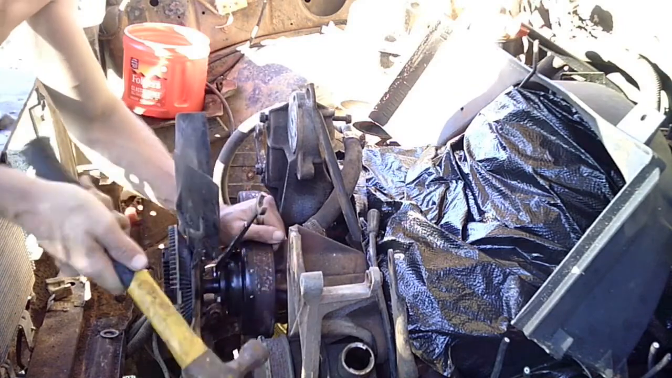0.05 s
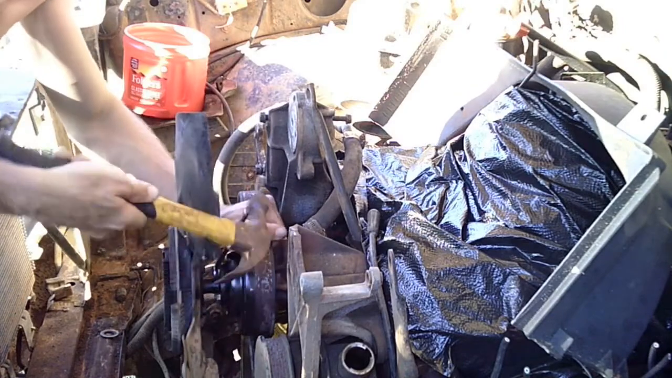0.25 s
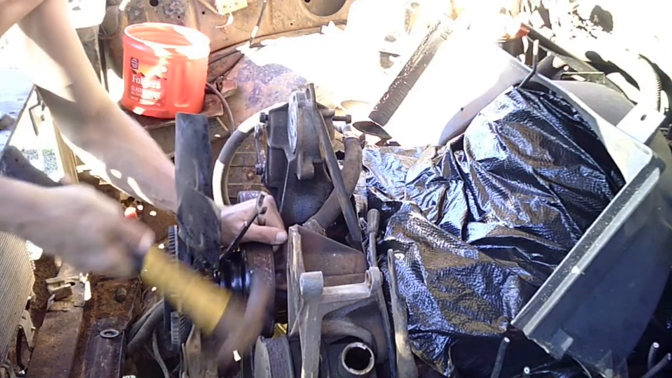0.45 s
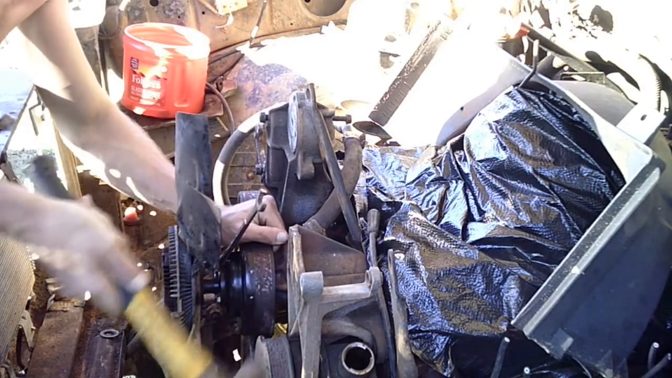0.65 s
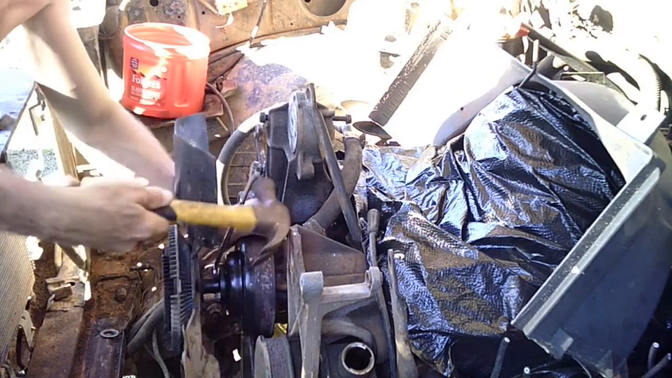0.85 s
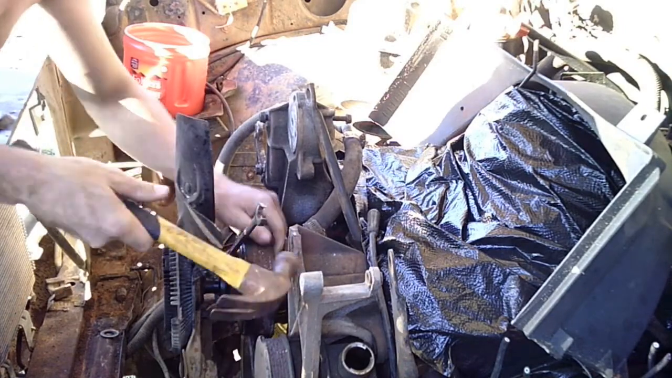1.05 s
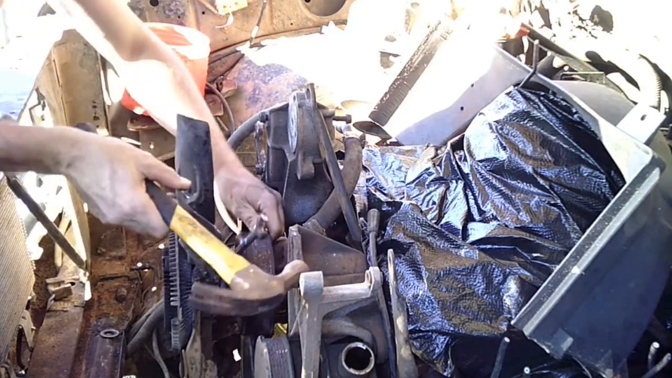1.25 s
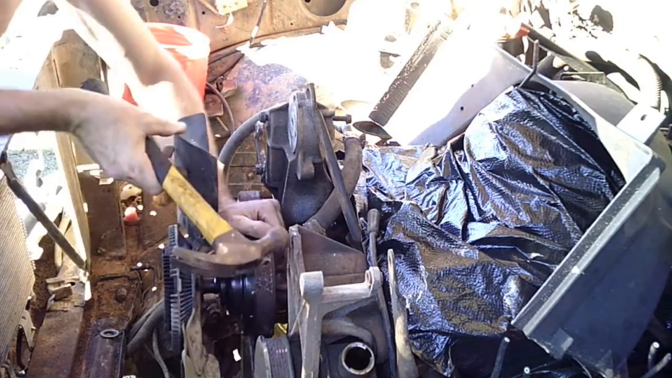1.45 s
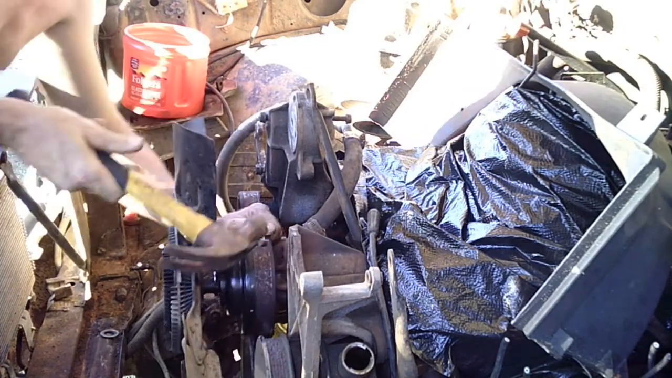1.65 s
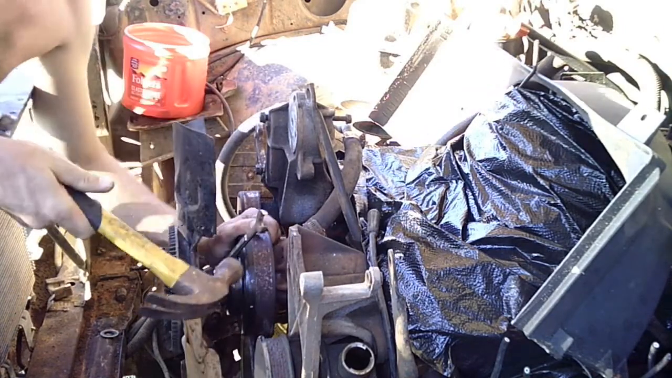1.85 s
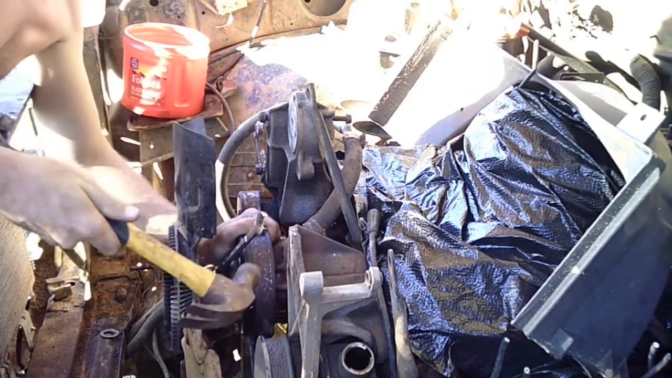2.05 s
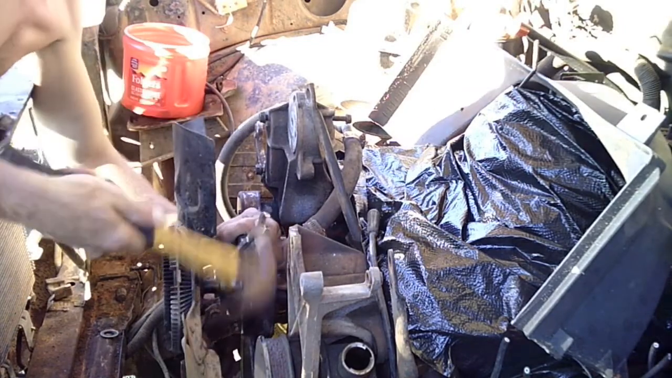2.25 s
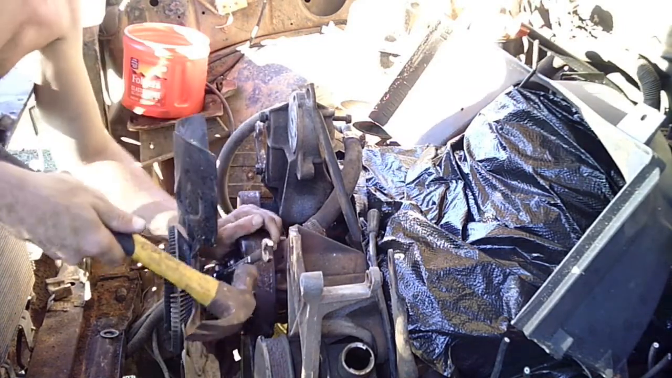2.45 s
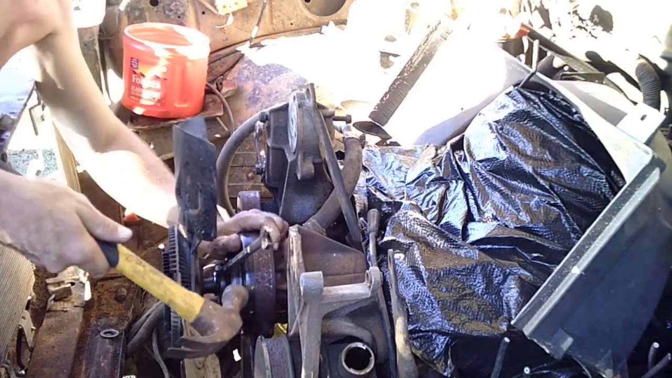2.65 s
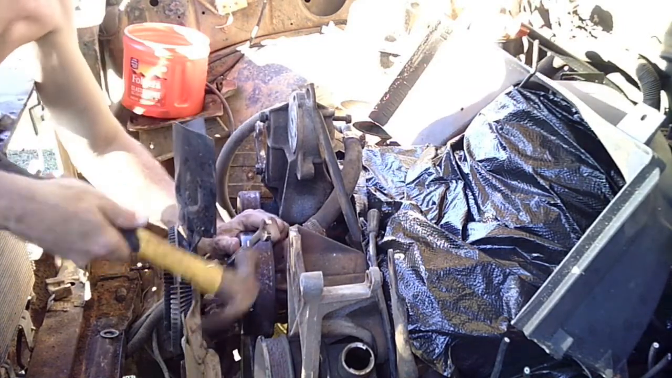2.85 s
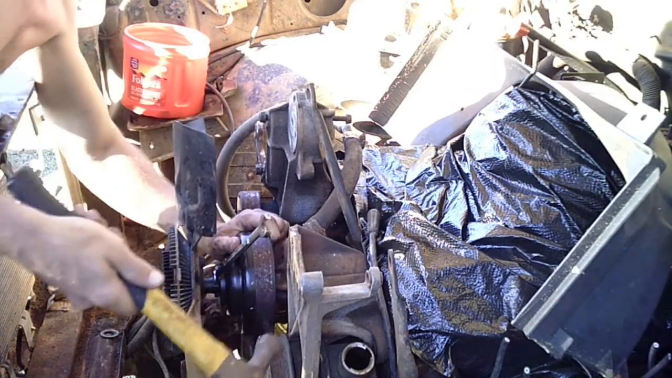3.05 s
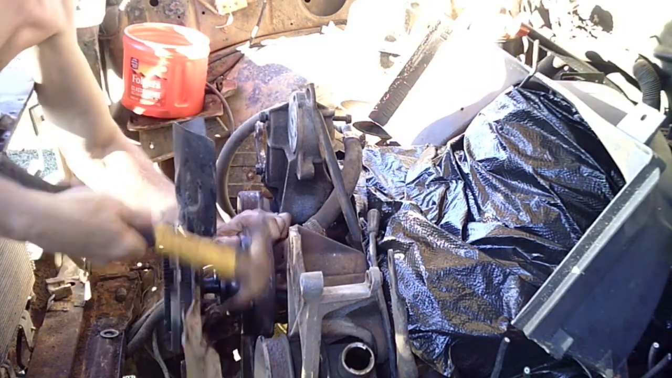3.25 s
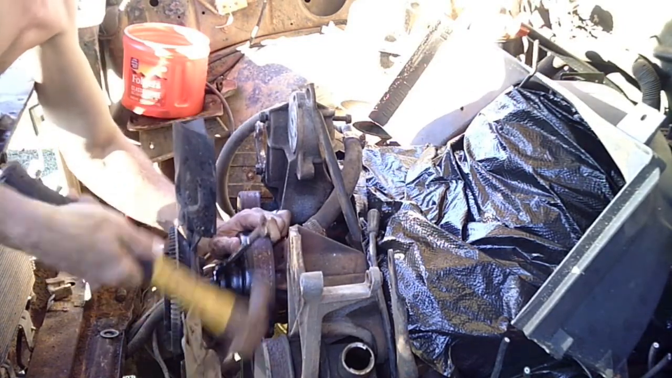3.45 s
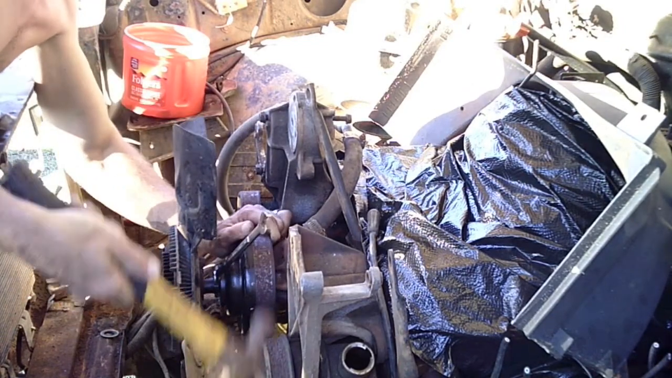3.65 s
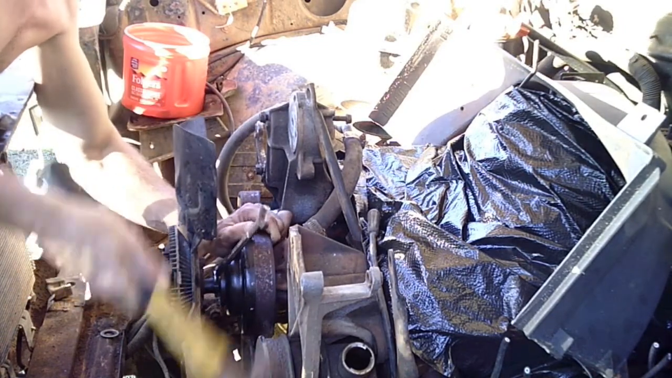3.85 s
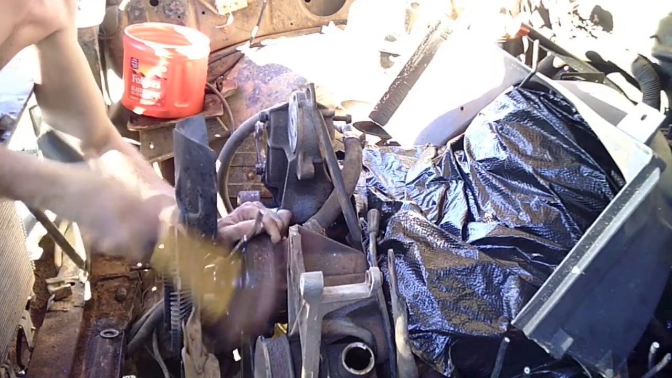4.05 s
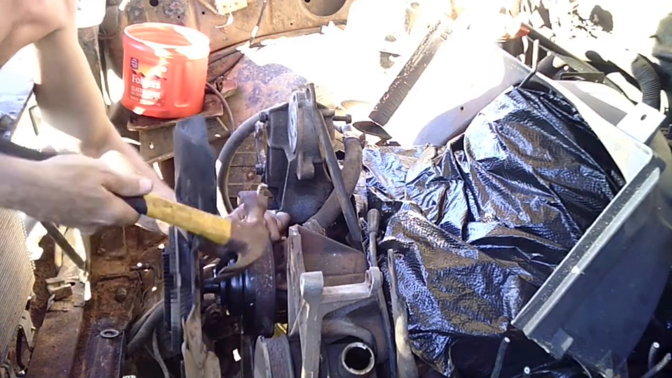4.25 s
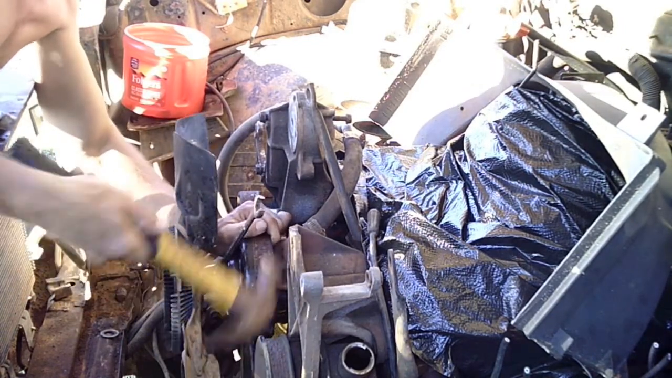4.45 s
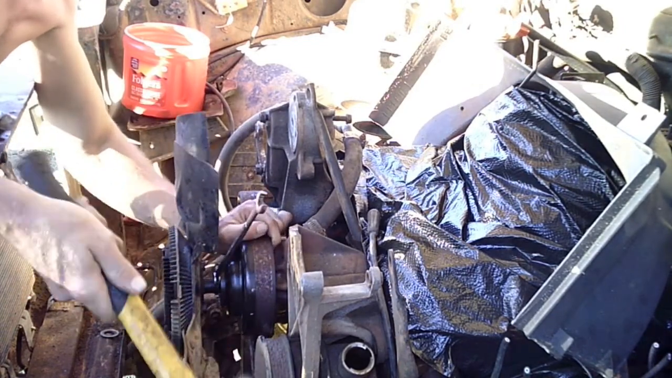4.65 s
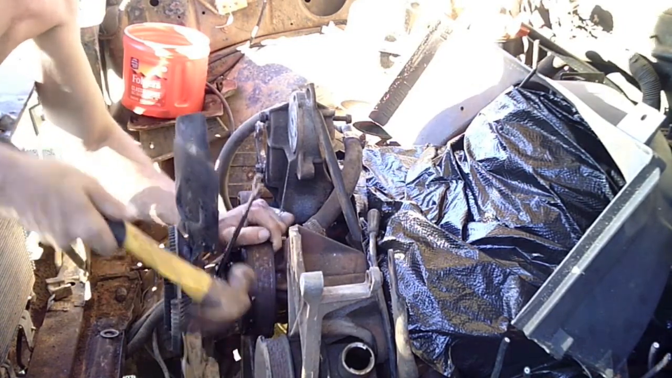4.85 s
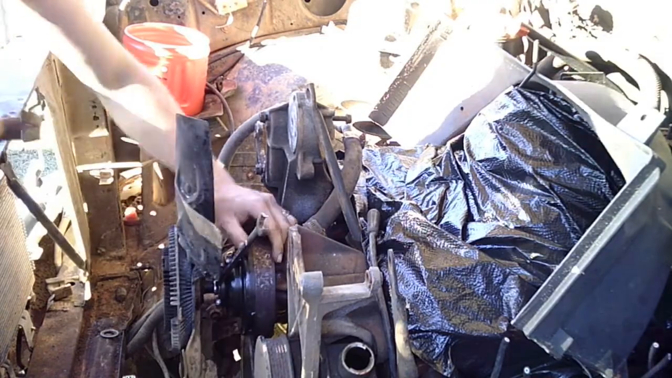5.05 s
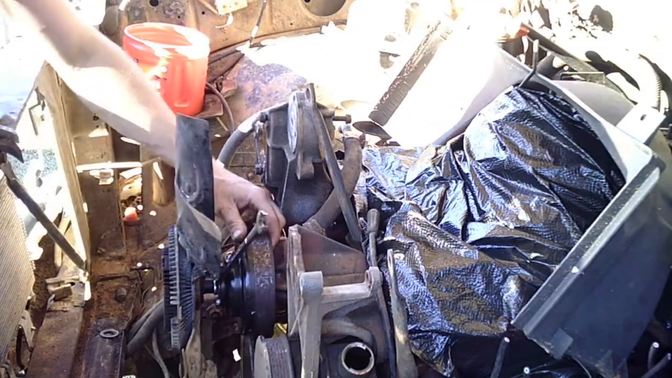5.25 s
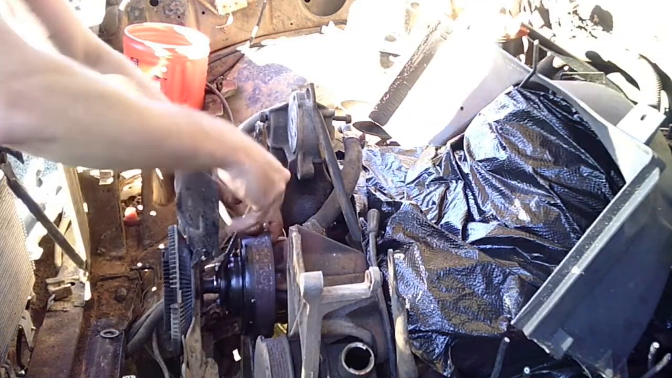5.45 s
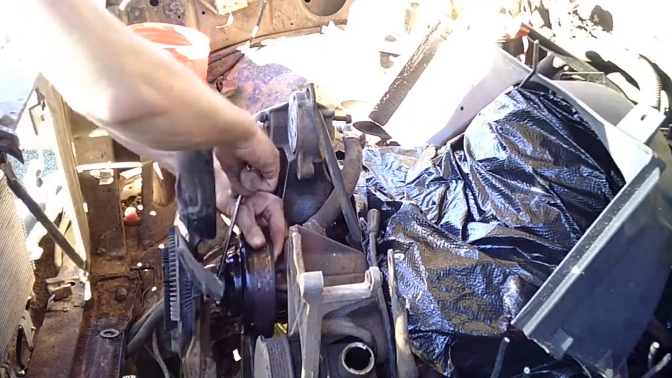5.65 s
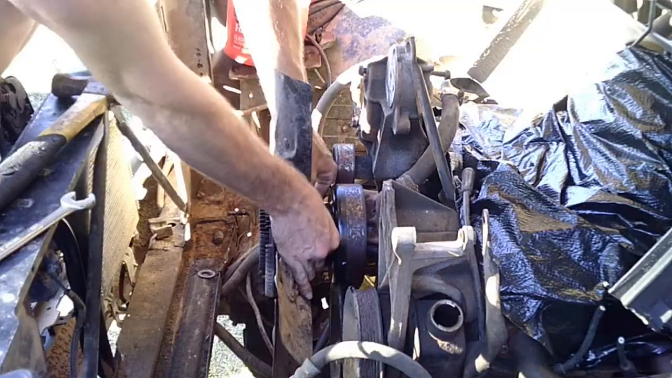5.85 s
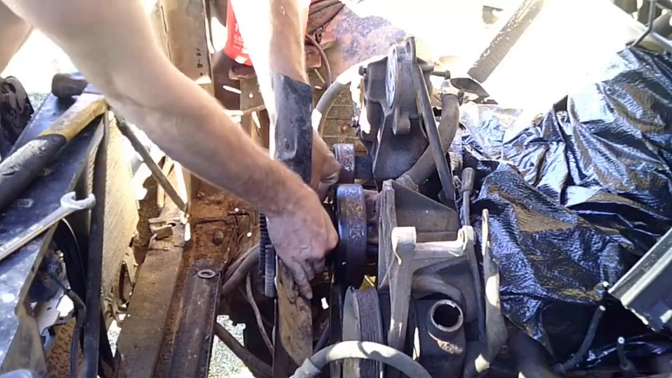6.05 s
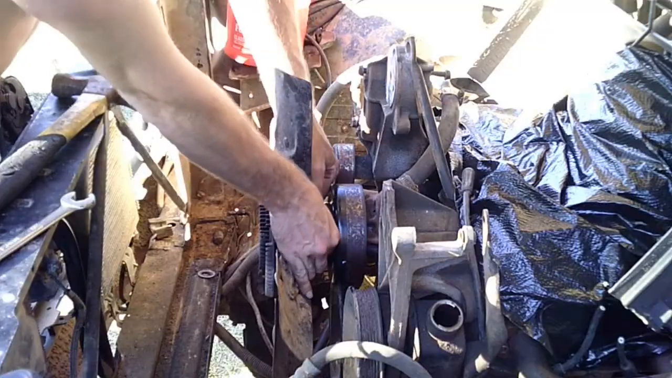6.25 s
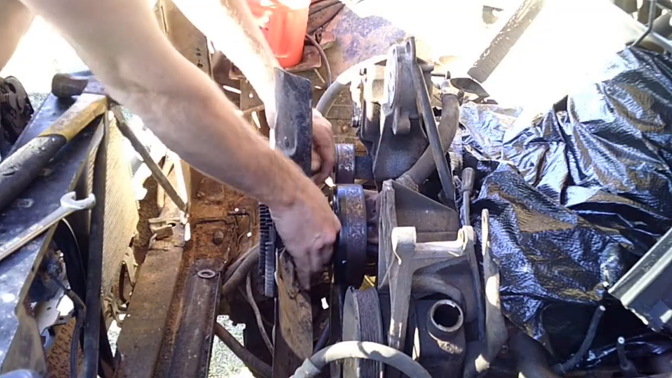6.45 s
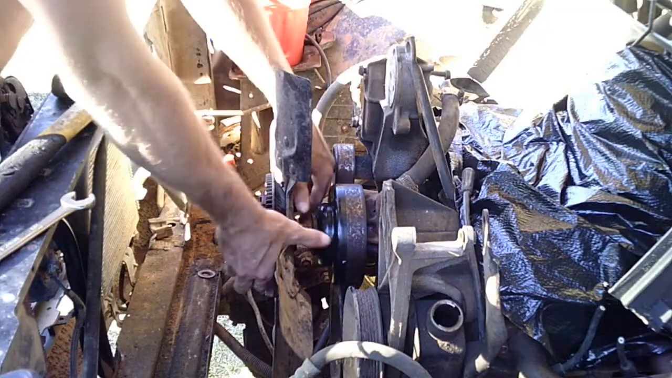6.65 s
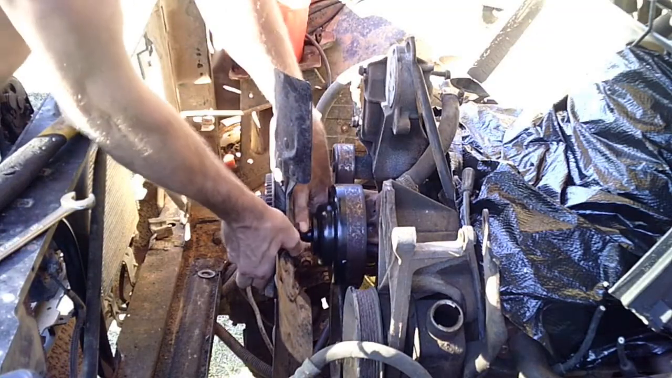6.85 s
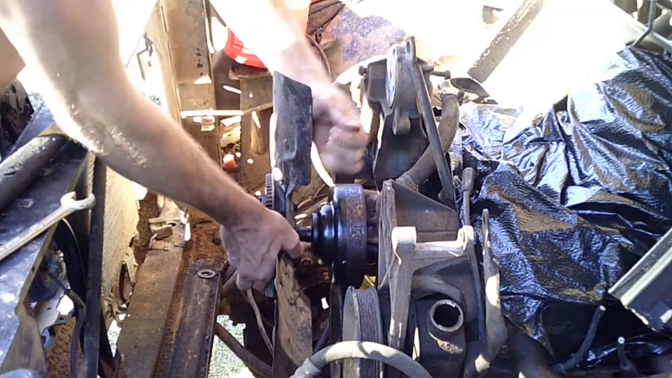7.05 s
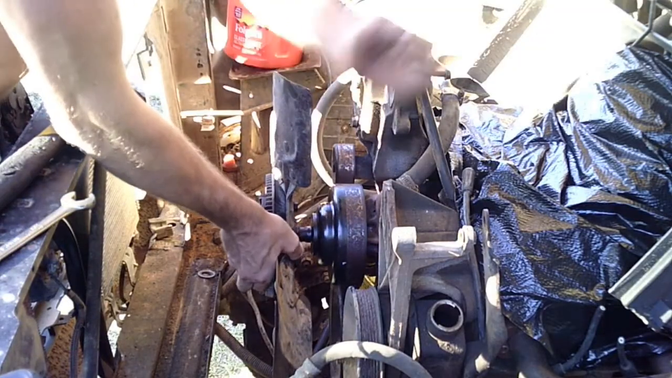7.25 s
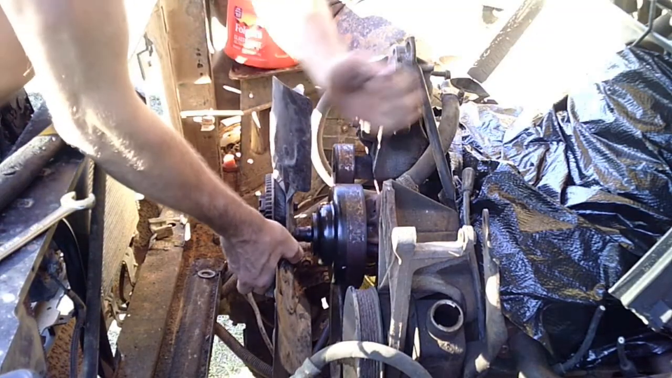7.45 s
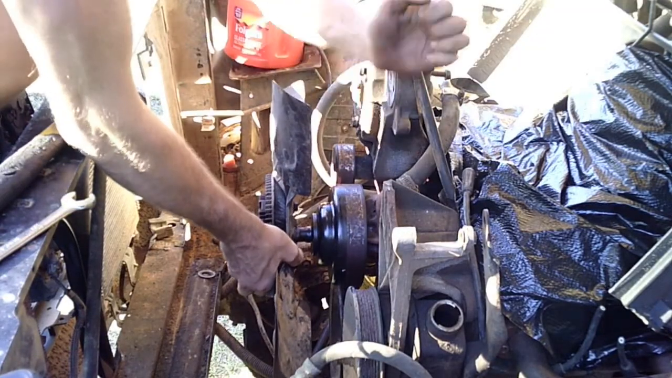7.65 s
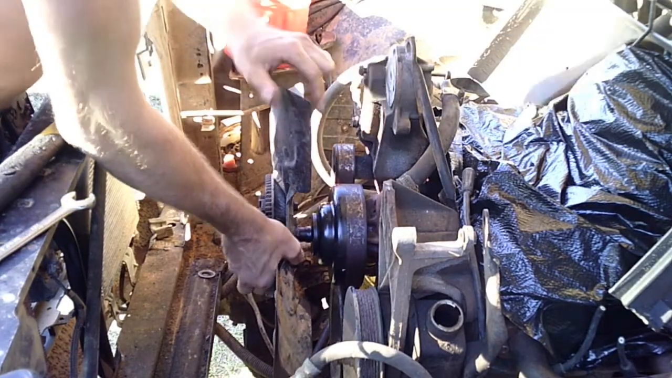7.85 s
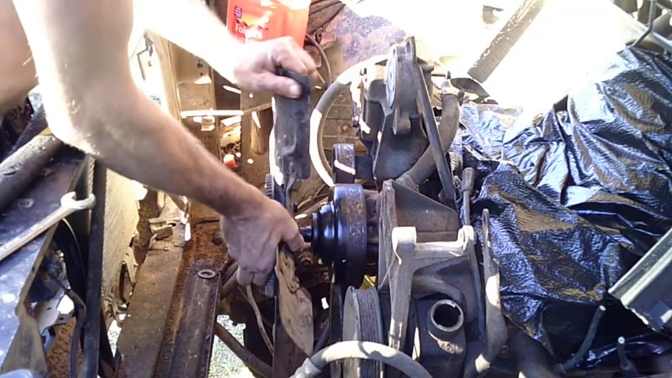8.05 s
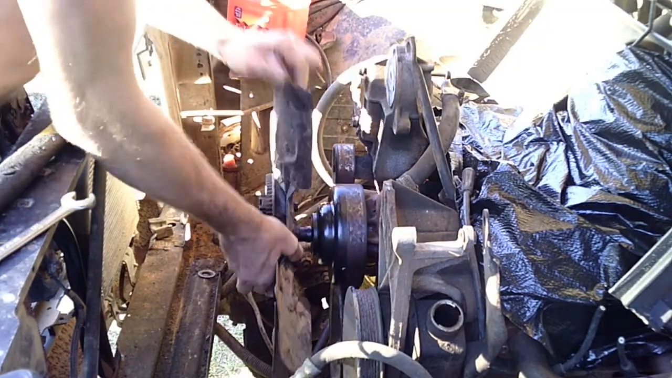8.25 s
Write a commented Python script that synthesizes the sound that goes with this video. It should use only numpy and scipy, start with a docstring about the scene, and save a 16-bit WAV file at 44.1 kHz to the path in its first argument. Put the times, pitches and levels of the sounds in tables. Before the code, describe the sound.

Light taps and hard hammer blows clank on steel outdoors, followed by a knock and soft clinks of handled metal parts.

```python
"""Hammering a wrench on a steel hub

Outdoors, a hammer strikes a wrench seated on a bolt of a machine hub, in light taps and hard blows.
Each impact is a short, harsh noise burst that holds, then cuts off; wrench, hammer head, hub, pipe and
collar ring on in damped modes. Parts are put down and handled. Wind rumbles on the microphone, far
traffic drones and a tarp rustles. The sound is dull, with little above 5 kHz; the hardest blows clip."""
import sys
import numpy as np
from scipy import signal
from scipy.fft import rfft, irfft, next_fast_len
from scipy.io import wavfile
from scipy.ndimage import uniform_filter1d, map_coordinates

SR = 44100
rng = np.random.default_rng(int(sys.argv[2]) if len(sys.argv) > 2 else 0)


def transcribe(signal):
    """Save signal, clipped to [-1, 1], as a 16-bit WAV file at the path in sys.argv[1]."""
    frames = np.atleast_2d(signal).T
    limited = np.clip(frames, -1, 1)
    pcm = np.round(limited * 32767).astype(np.int16)
    wavfile.write(sys.argv[1], SR, pcm)


N = 366471
T = np.arange(SR // 3) / SR  # time within one impact, in seconds

# Hammer blows. Each row: start in seconds, burst level in dB, burst length in seconds, rise in ms,
# brightness and thud in dB, high clang in Hz, then the levels in dB of wrench, hammer head, pipe,
# collar, and the wrench's high and low overtones.
BLOWS = [(-0.07, -14.5, 0.011, 3, 8, -50.5, 4500, -9, -31, -45.5, -37.5, -36, -29),
         (0.074, -33.5, 0.031, 10.5, 12.5, -57, 3910, -15.5, -29.5, -43.5, -42, -46, -40),
         (0.214, -5.5, 0.019, 2.64, 9, -34.5, 4048, -9, -22, -35, -34.5, -37, -24.5),
         (0.362, -16, 0.025, 6.5, 5.5, -70, 4720, -10.5, -15.5, -38, -42.5, -30.5, -29),
         (0.523, -28, 0.027, 9.3, -5, -48, 4870, -21.5, -31.5, -23.5, -45.5, -45.5, -42),
         (0.66, -4.5, 0.024, 0.86, -2, -29.5, 4180, -18, -28, -27, -35.5, -51, -29.5),
         (0.813, -17.5, 0.022, 1.6, 2.5, -26.5, 4680, -13, -16, -22.5, -32.5, -27, -29),
         (2.093, -30.5, 0.024, 3, 0.5, -63.5, 4550, -30, -39, -64, -50.5, -50.5, -58.5),
         (2.256, -19, 0.0033, 1.2, 11, -50.5, 4740, -17.5, -31, -70, -43, -42, -39),
         (2.795, -29.5, 0.018, 11, 3.5, -62.5, 3810, -27, -33.5, -51, -64, -60, -50),
         (2.956, -38, 0.037, 4.9, 5, -58, 4220, -19.5, -34.5, -46.5, -46.5, -50.5, -45.5),
         (3.084, -15, 0.023, 7.1, 10, -58, 3920, -11.5, -17.5, -44, -42.5, -46.5, -31.5),
         (3.245, -29, 0.026, 3.8, 5, -50, 4690, -16.5, -27, -46, -41.5, -48, -47),
         (3.383, -3, 0.018, 7, 12.5, -35.5, 4527, -14, -17, -42, -44, -42.5, -40),
         (3.571, -6, 0.02, 4.4, 11, -50.5, 4800, -14.5, -20.5, -33, -37, -42.5, -24.5),
         (3.726, -21.5, 0.025, 4, 8.5, -57.5, 4575, -15.5, -22.5, -46, -30, -44.5, -35),
         (3.873, -7.5, 0.018, 1.24, 4, -47, 4480, -19, -12.5, -49, -39.5, -24.5, -39.5),
         (4.054, -2.5, 0.024, 9.7, 16, -42, 4400, -27, -12.5, -35, -38, -35, -43.5),
         (4.238, -31.5, 0.029, 7.7, -6, -55, 4560, -23.5, -24.5, -46, -40.5, -41, -35),
         (4.382, -4, 0.022, 1.5, -6.5, -25.5, 3544, -13.5, -11.5, -33, -31, -29.5, -23),
         (4.557, -28, 0.026, 7.3, 1, -62.5, 4300, -18, -26.5, -51.5, -35.5, -41.5, -31.5),
         (4.71, -5, 0.011, 1.7, 4, -28, 4290, -19, -27.5, -25, -49.5, -51, -54),
         (5.615, -50, 0.025, 4.3, 15.5, -56.5, 3373, -57.5, -47.5, -69, -49, -54, -63)]
# Knocks of handled parts, and at 4.049 s a short tick that leads into the hard blow. Each row: start in
# seconds, burst level in dB, burst length in seconds, body, brightness and thud in dB, low and high clang in
# Hz, lift of the clangs in dB.
KNOCKS = [(0.84, -27, 0.033, -4, 2, -59, 743, 4770, 20),
          (1.061, -27, 0.034, 4, -8.5, -77.5, 710, 2630, 14.5),
          (1.412, -37, 0.021, -25, -4, -72, 1017, 4760, 20.5),
          (1.518, -49, 0.059, -21, -2.5, -76, 624, 4268, 17),
          (1.585, -39, 0.032, -20, 0, -66, 1410, 3870, 18),
          (1.728, -54, 0.017, -31, -21, -64, 1625, 2164, 30),
          (4.049, -16, 0.029, -13.5, -44, -62, 678, 2390, 11),
          (5.101, -12.5, 0.0056, -1.5, -9, -24, 890, 2240, 18),
          (5.126, -30.5, 0.044, 7, -18, -23.5, 1037, 2490, 18),
          (5.293, -42, 0.033, 14.5, -19, -29.5, 922, 2800, 18),
          (6.324, -55, 0.017, -17, -1.5, -75.5, 1480, 4215, 21),
          (6.554, -56, 0.038, -6, -5, -58.5, 1447, 3240, 15),
          (6.713, -45, 0.034, 16, -12.5, -34, 550, 1730, -2),
          (7.014, -40, 0.017, -20, -2.5, -58, 1610, 2090, 10.5),
          (7.165, -42.5, 0.024, -17.5, -6.5, -66.5, 1410, 4550, 12.5),
          (7.407, -29, 0.012, -13, -4, -46.5, 750, 4320, 13),
          (7.489, -53.5, 0.026, 0.5, 2.5, -65, 856, 1710, 7),
          (7.667, -25.5, 0.01, -13, 1.5, -39, 763, 2040, 24),
          (7.738, -44, 0.037, -4, -1.5, -51, 640, 3740, 4),
          (8.062, -56, 0.02, -23.5, 11, -72.5, 750, 1925, 15.5)]
# Modes of hammer head and hub. Each row: frequency in Hz, relative level in dB, nominal t60 in seconds.
HEAD_MODES = [(4245, -15, .09), (4352, -15, .09), (4468, -11, .14), (4560, -14, .045), (4650, -17, .05),
              (5000, -18, .05), (5268, -17, .06), (5755, -14, .05)]
HUB_MODES = [(1696, -17, .11), (1748, -17, .24), (1925, -18, .16), (2205, -17, .19), (2480, -15, .18),
             (2570, -14, .13), (2665, -16, .22), (2780, -16, .1), (2900, -14, .12), (2965, -14, .1),
             (3640, -14, .17), (3790, -16, .12), (3905, -13, .09), (4120, -14, .11)]


def amp(db):
    """Amplitude ratio: a factor of ten for every 20 dB."""
    return np.exp(np.asarray(db) * np.log(10) / 20)


def unit(x):
    """Normalisation to an rms of 1."""
    return x / np.sqrt(np.mean(x ** 2) + 1e-20)


def along(points, hz):
    """Interpolation of (Hz, value) points on a logarithmic frequency axis."""
    corners, values = np.transpose(points)
    return np.interp(np.log(hz + 1), np.log(corners + 1), values)


def filtered(x, response):
    """Linear filtering: the spectrum is multiplied by a frequency response."""
    size = next_fast_len(x.shape[-1] + 2048)
    return irfft(rfft(x, size) * response(np.fft.rfftfreq(size, 1 / SR)), size)[..., :x.shape[-1]]


def noise(spectrum, size):
    """Spectral shaping of white noise, at an rms of 1."""
    return unit(filtered(rng.standard_normal(size), lambda hz: amp(along(spectrum, hz))))


def patchy(spectrum, patchy_db):
    """Noise of rms 1, randomly modulated in small patches of time and frequency."""
    cells = signal.stft(noise(spectrum, N), nperseg=512)[2]
    field = uniform_filter1d(rng.standard_normal(cells.shape), size=5, axis=0)
    field = uniform_filter1d(field, size=6, axis=1)
    return unit(signal.istft(cells * amp(patchy_db * unit(field)), nperseg=512)[1][:N])


def wobble(rate):
    """Smooth random modulation: a spline through `rate` knots a second."""
    return map_coordinates(rng.standard_normal(int(N * rate / SR) + 4), [np.arange(N) * rate / SR])


def add(track, start, sound):
    """Superposition of a sound at a start time in seconds, which may be negative."""
    at = round(start * SR)
    part = track[max(at, 0):][:len(sound) + min(at, 0)]
    part += sound[max(-at, 0):][:len(part)]


def held(length, rise, sag_db):
    """Plateau envelope: it rises, sags a little and stops abruptly."""
    stop = 1 / (1 + np.exp(np.minimum((T - length) / 0.0025, 60)))
    return np.minimum(T / rise, 1) * amp(-sag_db * T / length) * stop


def burst(db, length, rise, body_db, bright_db, thud_db, clangs):
    """Source and filter: harsh noise with chance resonances and (Hz, dB) clangs holds, then cuts off."""
    # Corners of the spectrum. Each entry: frequency in Hz.
    corner_hz = [40, 200, 650, 1200, 2300, 4500, 6500]
    corner_db = [thud_db - db - 12, thud_db - db + 9.5, body_db + 9, body_db / 2 + 6.5,
                 -bright_db / 2, bright_db / 2, bright_db / 2]
    colour = list(zip(corner_hz, corner_db))
    bump_hz = np.arange(100, 7000, 90)
    bumps = list(zip(bump_hz, 2.6 * rng.standard_normal(len(bump_hz))))

    def response(hz):
        peaks = sum(amp(lift_db - 6) / (1 + ((hz - centre) / 50) ** 2) for centre, lift_db in clangs)
        return amp(along(colour, hz) + along(bumps, hz)) * (1.5 + peaks)

    treble_rms = np.sqrt(np.mean(response(np.arange(1500, 5000, 20)) ** 2))
    harsh = filtered(rng.standard_normal(len(T)), response) / treble_rms
    return amp(db + 10.5) * harsh * held(length, rise, sag_db=4)


def ring(modes, length, rise, scatter_db, flutter_db, t60_scale=1):
    """Damped modal vibration: modes of random strength hold, step down, then decay."""
    hz, db, t60 = np.transpose(modes)[:, :, None]
    length = length + 0.0059  # the ring holds its level a moment longer than the burst
    strength, phase = rng.standard_normal((2, len(modes), 1))
    decay_db = 60 * (T - 0.85 * np.minimum(T, length)) / (t60 * t60_scale)  # slower during the hold
    knots = np.arange(0, 0.36, 0.012)
    flutter = np.array([np.interp(T, knots, rng.standard_normal(len(knots))) for _ in modes])
    level_db = db + scatter_db * strength - decay_db + flutter_db * flutter
    waves = amp(level_db) * np.sin(2 * np.pi * hz * T + 3 * phase)
    return waves.sum(axis=0) * (np.minimum(T / rise, 1) + held(length, rise, sag_db=3))


def after_hiss(length, rise):
    """Two-stage decay: a quieter hiss holds about 20 ms past the burst, then fades."""
    hiss = noise([(300, -25), (800, 1.5), (1500, 0.5), (2500, -4), (4500, 0)], len(T))
    hold = amp(-9) * held(length + 0.022, rise, sag_db=0.5)
    fade = amp(-6.5 - 60 * T / 0.16) * np.minimum(T / rise, 1)
    return hiss * (hold + fade)


def hammer_blows():
    """Impact excitation: each blow gives a noise burst, a frame thud and the ring of the steel parts."""
    # Modes of each part. Each row: frequency in Hz, relative level in dB, nominal t60 in seconds.
    frame_modes = [(152, -12, 0.53), (294, -16.5, 0.045)]
    wrench_modes = [(1031, -5, 0.26), (1082, -14.5, 0.092), (622, -29, 0.17)]
    pipe_modes = [(711, -14, 0.2), (775, -13, .2), (830, -14, 0.45), (900, -19, .3), (960, -15.5, 0.063)]
    collar_modes = [(3205, -4, .15), (3265, -14.5, .48)]
    # Low and high wrench overtones, and a side tone under the hub's ring.
    # Each row: frequency in Hz, t60 in seconds.
    overtones = [(1434, .16), (4800, .16), (1225, .25)]
    low_clang_hz, regrip_s = 2930, 1.5
    out = np.zeros(N)
    for start, db, length, rise_ms, bright_db, thud_db, high_clang_hz, *part_levels in BLOWS:
        wrench_db, head_db, pipe_db, collar_db, high_db, low_db = part_levels
        rise = rise_ms / 1000
        body_db = -19 - 0.3 * bright_db
        hub_db = -21 + 0.55 * db
        lift_db = 6.5 - 0.24 * db  # clangs stand out more in a light tap
        clangs = [(low_clang_hz, lift_db), (high_clang_hz, lift_db + 8)]
        grip = 0.42 if start < regrip_s else 0.87  # the hand damps the wrench less once it shifts
        overtone_db = low_db, high_db, hub_db - 14.5
        overtone_modes = [(hz, level, t60) for (hz, t60), level in zip(overtones, overtone_db)]
        blow = burst(db, length, rise, body_db, bright_db, thud_db, clangs)
        blow += amp(thud_db) * ring(frame_modes, length, rise, scatter_db=1.6, flutter_db=5.5)
        blow += amp(wrench_db) * ring(wrench_modes, length, rise, scatter_db=0.73, flutter_db=0,
                                      t60_scale=grip)
        blow += ring(overtone_modes, length, rise, scatter_db=0.92, flutter_db=2)
        blow += amp(head_db) * ring(HEAD_MODES, length, rise, scatter_db=3, flutter_db=3)
        blow += amp(hub_db) * ring(HUB_MODES, length, rise, scatter_db=4, flutter_db=3.5, t60_scale=0.8)
        blow += amp(pipe_db) * ring(pipe_modes, length, rise, scatter_db=3, flutter_db=1.5)
        blow += amp(collar_db) * ring(collar_modes, length, rise, scatter_db=2.5, flutter_db=3)
        blow += amp(db - 19.5) * after_hiss(length, rise)
        add(out, start, blow)
    return out


def wind(level_db):
    """Turbulent pressure buffets the microphone; thuds shake its stand and swell the same rumble."""
    # Rumble spectrum. Each row: frequency in Hz, relative spectral density in dB.
    spectrum = [(12, -33.5), (20, -5.5), (27, 0.5), (113, -6), (252, -20), (285, -24), (400, -25),
                (520, -53), (880, -120)]
    shudder_db, shudder_t60 = -26.5, 0.9
    envelope = amp(level_db)
    for start, _, _, _, _, thud_db, *_ in BLOWS + KNOCKS:
        shudder = amp(thud_db + shudder_db - 60 * T / shudder_t60) * np.minimum(T / 0.017, 1)
        add(envelope, start, shudder)
    return envelope * unit(amp(0.63 * wobble(14)) * noise(spectrum, N))


def traffic():
    """Broadband noise of distant traffic: a drone whose level drifts slowly."""
    # Drone spectrum. Each row: frequency in Hz, relative spectral density in dB.
    spectrum = [(150, -39.5), (260, -5.5), (560, 0), (1200, -3.5), (2500, -12), (6000, -28)]
    return amp(-62.5 + 1.5 * wobble(2.5)) * patchy(spectrum, patchy_db=3.5)


def tarp(level_db):
    """Amplitude-modulated noise: a tarp rustles in short flurries."""
    # Rustle spectrum. Each row: frequency in Hz, relative spectral density in dB.
    spectrum = [(500, -25), (1200, -7.5), (2200, -2), (4400, -4), (5800, 1.5), (7500, -29)]
    return amp(level_db) * unit(amp(1.8 * wobble(52)) * patchy(spectrum, patchy_db=3.5))


def bench_knocks():
    """Impact excitation: each knock, mostly a part put down, gives a burst, the ring of bench and steel, and a
    short tail."""
    # Bench modes. Each row: frequency in Hz, relative level in dB, t60 in seconds.
    bench_modes = [(190, -13, .08), (287, -10, .12), (340, -12, .1), (580, -12, .07)]
    out = np.zeros(N)
    for start, db, length, body_db, bright_db, thud_db, low_hz, high_hz, lift_db in KNOCKS:
        rise = 0.23 * length
        clangs = [(low_hz, lift_db), (high_hz, lift_db)]
        knock = burst(db, length, rise, body_db, bright_db, thud_db, clangs)
        knock += amp(thud_db) * ring(bench_modes, length, rise, scatter_db=0.64, flutter_db=1.5)
        steel = ring(HUB_MODES + HEAD_MODES, length, rise, scatter_db=5, flutter_db=3, t60_scale=0.6)
        knock += amp(db - 16.5 - 0.4 * body_db) * steel
        tail = noise([(150, body_db), (700, body_db + 9), (2300, 0), (4500, bright_db)], len(T))
        build_up = np.minimum(T, length) / 0.11  # a longer burst leaves a louder tail
        knock += amp(db + 1 - 60 * T / 0.17) * tail * build_up
        add(out, start, knock)
    return out


def clinks():
    """Single-mode vibration: small parts in the fingers each sound one brief, faint tone."""
    # Timed clinks. Each row: start in seconds, frequency in Hz, level in dB.
    timed = [(1.428, 650, -57), (1.622, 635, -54), (1.616, 1046, -47.5), (6.173, 1430, -58),
             (6.172, 4400, -53.5), (6.345, 1536, -59), (6.472, 2100, -54.5), (7.832, 2500, -55.5),
             (7.926, 1900, -51), (7.985, 2520, -62.5)]
    first_s, last_s, count, cycles = 5.85, 8.3, 40, 43
    scattered = [(first_s + (last_s - first_s) * when, 1300 * 3.5 ** pitch, -64 + 7 * strength)
                 for when, pitch, strength in rng.random((count, 3))]
    out = np.zeros(N)
    for start, hz, db in timed + scattered:
        add(out, start, amp(db) * np.sin(2 * np.pi * hz * T) * held(cycles / hz, rise=0.002, sag_db=3))
    return out


def scene():
    """Superposition of all sources at one microphone."""
    # Course of the breeze. Each row: time in seconds, wind level in dB, tarp level in dB.
    breeze = [(0.0, -54, -70.5), (0.83, -46, -57.5), (1.18, -53.5, -61), (1.67, -55.5, -59.5),
              (2.01, -55, -64.5), (2.92, -54.5, -67), (3.28, -51, -59.5), (3.4, -51.5, -63),
              (3.96, -53, -62), (4.07, -55.5, -59.5), (4.47, -50.5, -68), (4.72, -56, -63),
              (5.44, -53, -67.5), (6.5, -55, -62), (7.1, -52, -62), (7.57, -44, -57.5), (7.87, -52.5, -53),
              (8.31, -53.5, -55)]
    times, *levels = np.transpose(breeze)
    wind_db, tarp_db = [np.interp(np.arange(N) / SR, times, db) for db in levels]
    return (hammer_blows() + bench_knocks() + clinks() + wind(wind_db) + traffic() + tarp(tarp_db))[None]


def record(dry):
    """Low-pass filtering and saturation: a treble roll-off, a clipping converter, then a band limit."""
    # Treble roll-off. Each row: frequency in Hz, gain in dB.
    roll_off = [(20, 1), (4700, -2), (5400, -10), (5900, -24.5), (6600, -46), (7500, -77), (9000, -110)]
    dc_offset, band_limit_hz = 0.003, 16000
    dull = filtered(dry, lambda hz: amp(along(roll_off, hz)))
    hiss = amp(-94.5) * rng.standard_normal(N)
    converted = np.clip(dull, -1, 1) + dc_offset + hiss
    return filtered(converted, lambda hz: 1 / (1 + (hz / band_limit_hz) ** 60))


dry = scene()
out = record(dry)
transcribe(out)
```